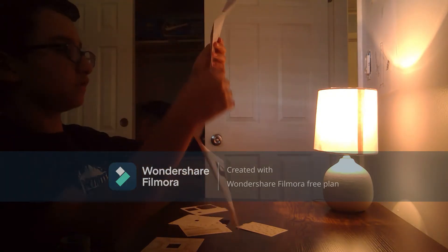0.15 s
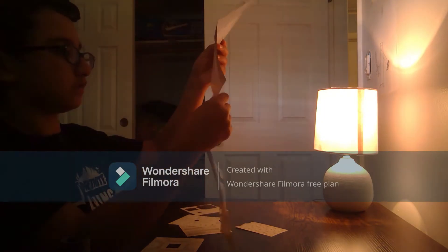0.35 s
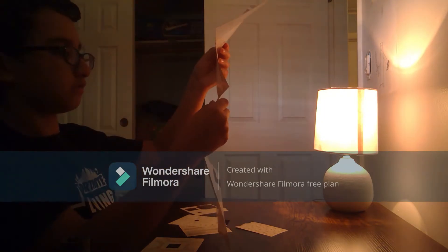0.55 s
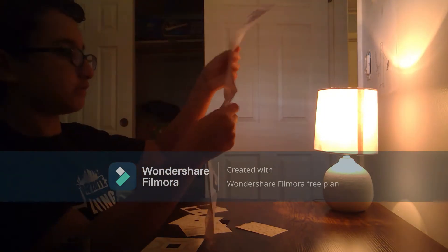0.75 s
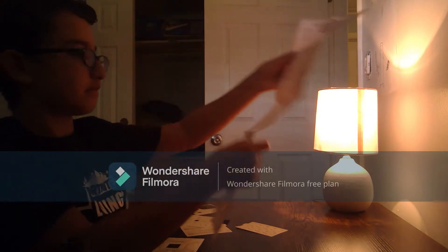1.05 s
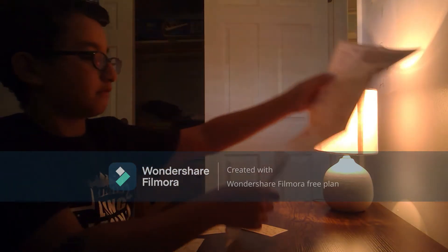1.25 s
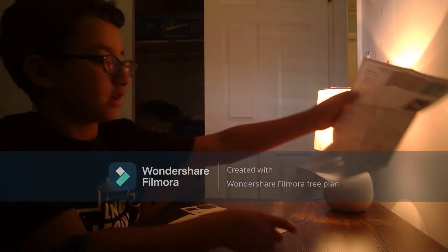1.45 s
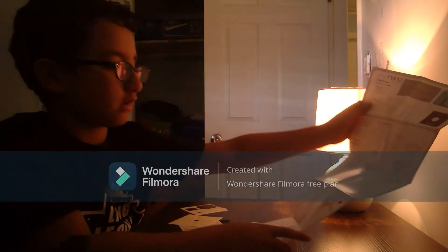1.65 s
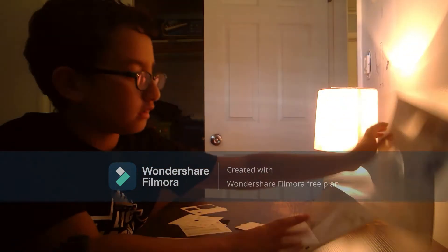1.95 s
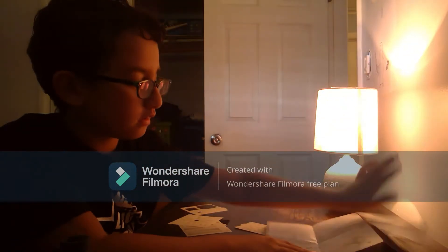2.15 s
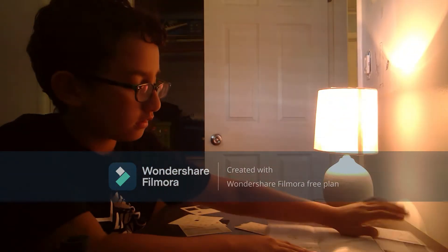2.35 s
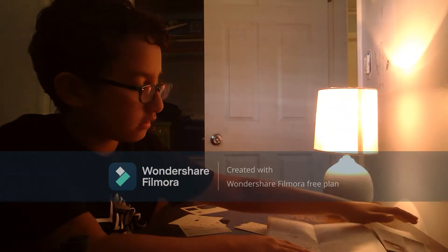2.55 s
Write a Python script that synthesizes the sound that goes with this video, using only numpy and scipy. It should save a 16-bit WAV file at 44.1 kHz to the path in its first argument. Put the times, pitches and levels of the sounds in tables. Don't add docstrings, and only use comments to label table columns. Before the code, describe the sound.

Paper handled close by, with small crinkles, then one loud crackling slap onto a wooden desk

```python
import sys
import numpy as np
from scipy import signal
from scipy.fft import rfft, irfft, next_fast_len
from scipy.io import wavfile
from scipy.ndimage import uniform_filter1d

SR = 44100
rng = np.random.default_rng(int(sys.argv[2]) if len(sys.argv) > 2 else 0)


def dump(signal):
    limited = np.clip(np.atleast_2d(signal).T, -1, 1)
    pcm = np.round(limited * 32767).astype(np.int16)
    wavfile.write(sys.argv[1], SR, pcm)


def ratio_of_db(decibels):
    return 10 ** (np.asarray(decibels, float) / 20)


N = 119070


def rms_one(x):
    return x / np.sqrt(np.mean(x ** 2) + 1e-20)


def at_hz(points, hz):
    table_hz, value = np.transpose(points)
    return np.interp(np.log(hz), np.log(table_hz), value)


def drift(rate_hz):
    pole = np.exp(-80 * np.pi * rate_hz / SR)
    noise = rng.standard_normal(N // 40 + 2002)
    slow = signal.lfilter([1], [1, -2 * pole, pole * pole], noise)[2000:]
    return np.interp(np.arange(N) / 40, np.arange(len(slow)), rms_one(slow))


def ring(clicks, hz, t60_s):
    decay, turn = ratio_of_db(-60 / (t60_s * SR)), 2 * np.pi * hz / SR
    return signal.lfilter([0, np.sin(turn)], [1, -2 * decay * np.cos(turn), decay * decay], clicks + 1e-18)


def sos(x, order, hz, kind):
    return signal.sosfilt(signal.butter(order, hz, kind, fs=SR, output="sos"), x)


def band(x, hz, octaves):
    edges = hz * 2 ** (np.array([-.5, .5]) * max(octaves, .1))
    return sos(x, 2, np.clip(edges, 10, .45 * SR), "band")


def stereo(pair, alike):
    alike = np.clip(alike, -1, 1)
    middle = np.sqrt(1 + alike) * pair[0]
    side = np.sqrt(1 - alike) * pair[1]
    return middle + side * [[1], [-1]]


def coloured(pairs, spectrum, patchy_db, flicker_hz):
    # hz, likeness
    likeness = [(60, 1), (150, 1), (300, 0.73), (700, 0.69), (2000, 0.14), (8000, -0.22)]
    low_hz, top_hz = spectrum[0][0], spectrum[-1][0]
    out = 0
    for k, hz in enumerate(low_hz * 2 ** np.arange(1 / 6, np.log2(top_hz / low_hz), 1 / 3)):
        flicker_db = patchy_db * drift(flicker_hz)[:pairs[0].shape[1]]
        noise = stereo(band(pairs[k % 2], hz, 1 / 3), at_hz(likeness, hz))
        out = out + ratio_of_db(at_hz(spectrum, hz) + flicker_db) * noise
    return rms_one(out)


def watery(x, patch_db):
    hz, _, spec = signal.stft(x, SR, nperseg=1024, noverlap=768)
    field = uniform_filter1d(rng.standard_normal(spec.shape[1:]), size=3, axis=0)
    field = rms_one(uniform_filter1d(field, size=10, axis=1))
    depth = np.minimum(hz / 1200, 1)[:, None]
    gain = ratio_of_db(patch_db * depth * field)
    return signal.istft(spec * gain, SR, nperseg=1024, noverlap=768)[1][:, :N]


def room_floor():
    # hz, level_db (per Hz)
    rumble_colour = [(20, 7.5), (100, -1), (200, -7.5), (400, -15.5), (800, -26), (1350, -26), (1900, -27),
                     (2400, -43.5)]
    # hz, level_db (per Hz)
    hiss_colour = [(2200, -24.5), (2600, -9.5), (3200, -9), (4500, -7.5), (5400, -5), (6500, -10.5),
                   (14000, -25), (16000, -31)]
    white = rng.standard_normal((2, 2, N))
    rumble = ratio_of_db(-64.5) * coloured(white, rumble_colour, patchy_db=0.5, flicker_hz=4)
    hiss = ratio_of_db(-72) * coloured(white[::-1], hiss_colour, patchy_db=0.61, flicker_hz=12)
    whine = ratio_of_db(-75) * rms_one(band(white[0], hz=5250, octaves=0.12))
    return watery(rumble + hiss, patch_db=4.8) + watery(whine, patch_db=2)


def hum():
    # pitch_hz, level_db, skirt_width_hz
    tones = [(58.9, -60, 9), (119.2, -74.5, 15), (176.3, -78.5, 8)]
    t = np.arange(N) / SR
    out = np.zeros(N)
    for hz, db, width_hz in tones:
        steady = np.sqrt(2) * np.sin(2 * np.pi * hz * t)
        skirt = rms_one(ring(rng.standard_normal(N + SR), hz, 3.3 / width_hz)[SR:])
        out += ratio_of_db(db) * (steady + ratio_of_db(-8) * skirt)
    return out


def room(x):
    t60_s, wall_cut_hz = 0.3, 5600
    size = next_fast_len(N + SR)
    w = 2 * np.pi * np.arange(size // 2 + 1) / size
    dull = np.exp(-2 * np.pi * wall_cut_hz / SR)
    wall = (1 - dull) / (1 - dull * np.exp(-1j * w))
    response = np.zeros((2, len(w)), complex)
    for k, lag in enumerate((rng.uniform(.006, .03, 16) * SR).astype(int)):
        loop = ratio_of_db(-60 * lag / SR / t60_s) * wall * np.exp(-1j * w * lag)
        response[k % 2] += loop / (1 - loop) * (-1) ** (k // 2)
    return irfft(rfft(x, size) * response, size)[:, :N]


def desk():
    # start_s, deep_mode_db, upper_modes_db
    pushes = [(0.971, -80, -51.5), (1.04, -77, -48.5), (1.24, -63, -53.5), (1.878, -57, -47.5),
              (2.077, -38, -43), (2.112, -40.5, -32.5), (2.147, -41.5, -32.5), (2.193, -32.5, -36),
              (2.301, -40.5, -50), (2.346, -73, -42), (2.40, -59, -46)]
    # pitch_hz, level_db, t60_s
    modes = [(57.6, 7.5, 0.3), (143.6, 1, 0.18), (119, -25, 0.3), (207.8, -8, 0.3)]
    # deep_mode_s, upper_modes_s
    contact_s = (.012, 0.0046)
    s, deep_db, upper_db = np.transpose(pushes)
    out = np.zeros(N)
    for k, (hz, level_db, t60_s) in enumerate(modes):
        force = np.zeros(N)
        force[(s * SR).astype(int)] = ratio_of_db(level_db + (upper_db if k else deep_db))
        bump = np.hanning(int(contact_s[min(k, 1)] * SR))
        out += ring(np.convolve(force, bump / bump.sum())[:N], hz, t60_s)
    return sos(out, 2, 49, "high")


def grains(count, per_s, spread_db):
    sizes = ratio_of_db(spread_db * np.minimum(rng.exponential(1, (2, count)), 5))
    sizes = sizes * rng.choice([-1, 1], (2, count))
    clicks = sizes * (rng.random((2, count)) < per_s / SR)
    return clicks + 0.27 * rng.standard_normal((2, count))


def rubs(table):
    out = np.zeros((2, N))
    for s, length_s, db, hz, octaves in table:
        i = int(s * SR)
        source = grains(count=SR // 3, per_s=2800, spread_db=1)[:, :int(length_s * SR) + 400]
        progress = np.arange(source.shape[1]) / SR / length_s
        swell = np.interp(progress, [0, 0.21, 1], [0, 1, 0])
        patch = ratio_of_db(db) * swell * rms_one(stereo(band(source, hz, octaves), alike=0.26))
        out[:, i:i + len(swell)] += patch[:, :N - i]
    return out


def cracks():
    # start_s, peak_db, top_hz, t60_s
    folds = [(1.8548, -49, 12000, 0.028), (1.8848, -52, 9000, .025), (1.9202, -49, 10000, .04),
             (1.968, -55, 12000, .04), (2.0757, -27.5, 4600, 0.025), (2.104, -37, 6000, .03),
             (2.1193, -50, 14000, 0.045), (2.1237, -37.5, 8900, 0.028), (2.1528, -22.5, 5500, 0.028),
             (2.1537, -31.5, 15000, 0.012), (2.29, -52, 9000, 0.067)]
    out, t = np.zeros((2, N)), np.arange(SR // 8) / SR
    for s, db, top_hz, t60_s in folds:
        noise = rng.standard_normal((2, len(t))) * ratio_of_db(-60 * t / t60_s)
        burst = sos(noise, 4, [1510, top_hz], "band")
        i = int(s * SR)
        out[:, i:i + len(t)] += ratio_of_db(db) * stereo(burst / np.abs(burst).max(), alike=0.33)
    return out


def snaps():
    # start_s, peak_db, ring_hz, width_octaves, t60_s
    creases = [(0.9798, -24, 1710, 1.1, 0.022), (.984, -31, 1820, 1.3, .06), (1.0414, -31, 2200, 0.8, .025),
               (1.0428, -33, 2150, .8, .025), (1.8551, -40, 3300, 1.2, .03), (1.8846, -48, 3400, 1.1, .02),
               (2.0758, -18, 2116, 1.34, .02), (2.0805, -24, 1910, 1.2, .025),
               (2.1044, -23, 1960, 1.1, 0.027), (2.123, -27, 5560, 0.63, .03),
               (2.1532, -10, 2320, 1.8, .014), (2.157, -23, 2380, 1.3, 0.028)]
    out, t = np.zeros((2, N)), np.arange(SR // 10) / SR
    click = 1. * (t == 0)
    for s, db, hz, octaves, t60_s in creases:
        noise = rng.standard_normal((2, len(t))) * ratio_of_db(-60 * t / t60_s)
        burst = band(band(noise, hz * 1.177, octaves), hz * 1.25, octaves + 1)
        detune, ring_s = rng.uniform(0.97, 1.61), 20 / hz
        rings = ring(click, hz, ring_s) - 0.74 * ring(click, hz * detune, ring_s)
        rings = band(ratio_of_db(-4) * rings, hz * 1.2, 1.46)
        one = stereo(burst / np.abs(burst).max(), alike=0.3) / 2 + rings
        i = int(s * SR)
        out[:, i:i + len(t)] += ratio_of_db(db - 3.5) * one
    return out


def crush():
    # time_s, level_db
    pressure = [
        [(2.072, -52), (2.079, -31.5), (2.098, -38.5), (2.128, -31.5), (2.148, -34.5), (2.16, -30.5),
         (2.2, -41.5), (2.275, -60)],
        [(2.262, -59), (2.28, -54), (2.30, -48), (2.36, -56.5), (2.45, -67), (2.51, -80)],
    ]
    # hz, level_db (per Hz)
    slap_colour = [(120, -5.5), (200, -4), (357, -11.5), (405, -5), (659, -4), (864, -3), (1950, -3.5),
                   (4980, -13), (15000, -48)]
    # hz, level_db (per Hz)
    smooth_colour = [(120, -9), (200, -2), (400, -11), (1200, -6.5), (1410, -4.5), (2090, -3), (4160, -7.5),
                     (5970, -23), (15000, -33.5)]
    out, t = np.zeros((2, N)), np.arange(SR // 3) / SR
    for rows, colour in zip(pressure, (slap_colour, smooth_colour)):
        s, db = np.transpose(rows)
        pairs = [grains(count=len(t), per_s=4000, spread_db=2.5) for _ in range(2)]
        press = ratio_of_db(np.interp(t + s[0], s, db, -140, -140))
        rustle = coloured(pairs, colour, patchy_db=2.04, flicker_hz=30)
        out[:, int(s[0] * SR):][:, :len(t)] += press * rustle
    return out


def slap():
    # pitch_hz, level_db
    sheet_modes = [(410, -11.5), (568, -3), (884, -2), (1146, -8.5), (1292, -11), (1944, 1)]
    crushed = crush()
    ringing = [sum(ratio_of_db(db) * ring(side, hz, t60_s=.07) for hz, db in sheet_modes) for side in crushed]
    return crushed + ratio_of_db(-42) * np.array(ringing)


def scene():
    # start_s, length_s, level_db, centre_hz, width_octaves
    rub_rows = [(0.0, 0.077, -71, 4600, 0.94), (0.092, .16, -71, 2000, 1.15),
                (0.299, 0.2, -74.5, 6870, 0.92), (0.527, 0.048, -63, 2800, 0.24),
                (0.559, 0.22, -69, 1656, 0.33), (0.562, 0.18, -74.5, 2650, 0.2),
                (0.716, 0.16, -70, 4700, 0.7), (0.936, 0.095, -59.5, 4170, 0.78),
                (0.945, 0.2, -57, 1720, 1.3), (.94, 0.064, -69.5, 8950, 1.2), (1.05, .2, -68, 4470, 0.58),
                (0.975, .07, -56, 1760, .9), (1.045, 0.084, -62, 2200, 1.1),
                (1.188, 0.19, -63.5, 2000, 1.36), (1.242, 0.29, -65.5, 3150, 0.4),
                (1.466, 0.36, -67.5, 2100, 2.6), (1.74, 0.33, -59, 3620, 1.14),
                (1.69, 0.14, -68, 3650, 0.33), (1.756, 0.16, -69, 4960, 2.4), (1.841, 0.14, -59, 4130, 2.4),
                (1.902, 0.12, -59, 4440, 1.7), (2.045, 0.036, -51, 1440, 1.4),
                (2.607, 0.32, -72, 3900, 0.36)]
    # start_s, length_s, level_db, centre_hz, width_octaves
    crinkle_rows = [(.955, 0.062, -53.5, 1067, 0.085), (.956, 0.028, -52, 1500, 0.34),
                    (0.979, 0.15, -57.5, 305, 1.3), (1.14, 0.12, -70, 460, 1.6),
                    (1.062, 0.024, -54.5, 2480, 0.21), (1.1, 0.018, -63, 1630, 0.38),
                    (1.279, 0.34, -75, 1360, 0.12), (1.709, 0.015, -61, 3600, 0.26),
                    (1.76, 0.048, -61.5, 6800, 0.49), (1.803, .02, -63, 3400, 1.7),
                    (1.853, 0.021, -43.5, 3770, 0.53), (1.853, 0.06, -58, 720, 1.5),
                    (1.86, .13, -60, 282, 1.2), (1.861, 0.023, -50.5, 1480, 0.18),
                    (1.883, .012, -45, 3700, 1), (1.917, .024, -52.5, 4400, 1.1),
                    (1.965, 0.02, -52.5, 3660, 0.84), (1.8, 0.013, -53.5, 3200, 1.36),
                    (2.05, 0.023, -43.5, 830, 1.04), (2.278, 0.12, -63.5, 8000, 0.38),
                    (2.268, 0.2, -54.5, 2030, 0.21), (2.275, 0.18, -54.5, 1140, 0.29),
                    (2.28, 0.19, -61, 3200, 0.13), (2.27, 0.14, -60.5, 4200, 0.12),
                    (2.27, 0.08, -68, 7300, .1), (.997, 0.038, -55, 1580, 0.45),
                    (1.078, .025, -58, 2400, .25), (.11, 0.073, -72, 523, 0.29),
                    (.925, 0.055, -70, 600, .4), (.49, 0.066, -75.5, 1250, 0.26)]
    low = desk() + hum()
    low = low * ratio_of_db([[.4], [-.4]]) + ratio_of_db(-26) * np.roll(low, 150) * [[1], [-1]]
    paper = watery(rubs(rub_rows), patch_db=4.5) + rubs(crinkle_rows)
    paper = paper + cracks() + snaps() + watery(slap(), patch_db=2)
    bass = sos(paper, 1, 330, "low")
    paper = (paper - bass) * ratio_of_db([[1.75], [-1.75]]) + bass.mean(axis=0)
    return room_floor() + low + paper + ratio_of_db(-16) * room(paper.mean(axis=0))


def low_pass(x):
    return signal.sosfilt(signal.butter(12, 16450, fs=SR, output="sos"), x)


def record(dry):
    mix = signal.sosfilt(signal.cheby2(10, 45, 16350, fs=SR, output="sos"), dry)
    return low_pass(mix)


dry = scene()
out = record(dry)
dump(out)
```